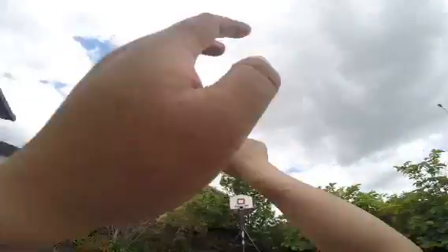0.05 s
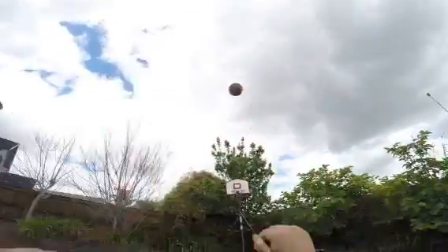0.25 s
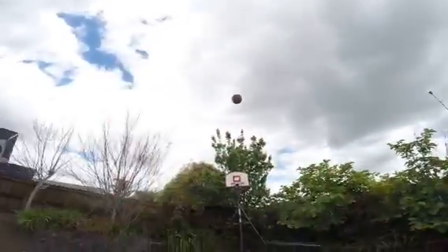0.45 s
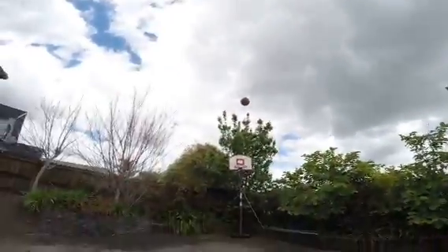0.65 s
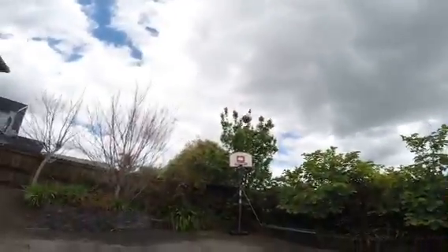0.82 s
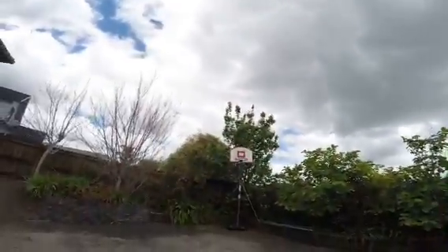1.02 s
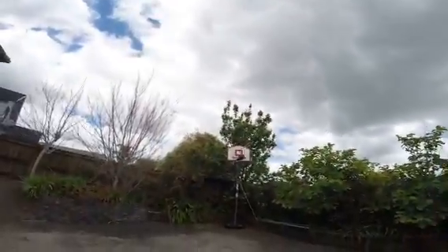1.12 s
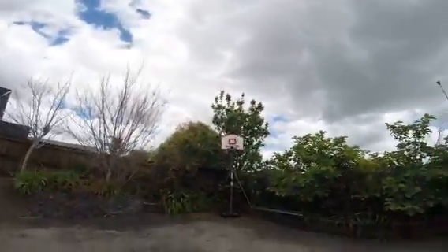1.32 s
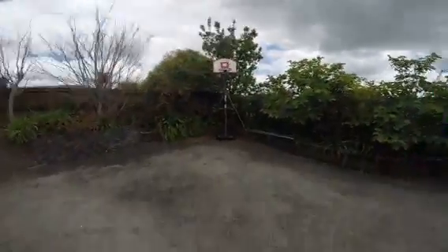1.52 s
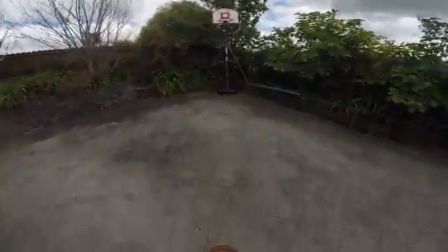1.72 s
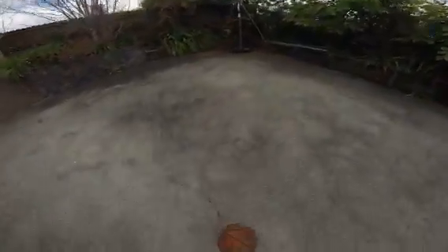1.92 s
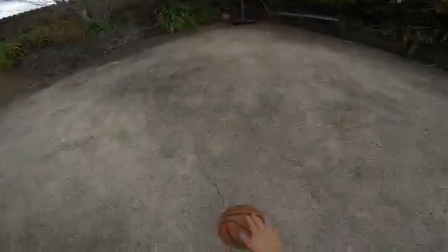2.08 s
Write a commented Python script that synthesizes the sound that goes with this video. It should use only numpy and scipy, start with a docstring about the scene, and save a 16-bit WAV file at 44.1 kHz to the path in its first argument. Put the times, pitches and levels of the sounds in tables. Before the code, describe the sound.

A basketball rattles in a steel rim and jingles through a chain net, several metres away in a quiet backyard. Before that, the throw rustles clothing and pushes a low puff of air over the body-worn microphone.

```python
"""A basketball rattles in the steel rim of a backyard hoop and drops through a chain net.
Its knocks ring the rim and thud the backboard; clashing links jingle; the yard echoes both.
Several metres away, at a body-worn camera, the throw rustles clothing and pushes air over
the microphone. Plastic ticks, light wind, an outdoor hush and a faint whine lie underneath."""
import sys
import numpy as np
from scipy import signal
from scipy.fft import rfft, irfft
from scipy.io import wavfile

SR = 44100
rng = np.random.default_rng(int(sys.argv[2]) if len(sys.argv) > 2 else 0)


def dump(signal):
    """Clip the signal to [-1, 1] and save it as 16-bit WAV at the path in sys.argv[1]."""
    limited = np.clip(np.atleast_2d(signal).T, -1, 1)
    pcm = np.round(limited * 32767).astype(np.int16)
    wavfile.write(sys.argv[1], SR, pcm)


N = 94815
T = np.arange(N) / SR


def rim(clack_db=-62, thud_db=-68, ring_db=-66.5, rise_s=0.0007):
    """Each knock chatters the loose rim, ringing its modes, and thuds the backboard."""
    # ball on rim: (time [s], level [dB], contact decay [s], relative backboard thud [dB])
    knocks = [(1.25, -8.5, 0.0068, 12), (1.2859, 4.5, 0.0065, -1.5), (1.294, 0, 0.0099, -4),
              (1.3008, -0.5, 0.013, -5), (1.313, -4.5, 0.0065, 5), (1.3218, -1, 0.0047, 8),
              (1.3271, -13, 0.0025, 11), (1.333, 0.5, 0.0043, -22), (1.338, -6.5, 0.0041, -10)]
    # dry contact spectrum: (frequency [Hz], level [dB])
    clack_spectrum = [(150, -25), (500, -6), (850, -5), (1400, 7), (1850, -8), (2500, 0), (3200, -9),
                      (5000, -10.5), (7500, -11.5), (15000, -25.5)]
    # rim and bracket: (frequency [Hz], level [dB], t60 [s])
    rim_modes = [(505, 2, 0.21), (597, -13, 0.1), (706, -1.5, 0.035), (1087, -14, 0.1), (1274, -2, 0.077),
                 (1345, -6, 0.19), (1437, -2, 0.11), (1460, 6, 0.18), (1484, 3.5, 0.19), (2110, 0, 0.12),
                 (2282, -9, 0.11), (2506, -7, 0.11), (2620, 7.5, 0.09), (3960, -18, 0.16)]
    # hollow backboard panel: (frequency [Hz], level [dB], t60 [s])
    board_modes = [(528, 4, 0.034), (730, 0, 0.028), (897, -3, 0.017), (1052, -4.5, 0.064)]
    blows = [amp(db) * swell(time_s, rise_s, decay_s) for time_s, db, decay_s, _ in knocks]
    chatter = sum(blows) * grains(per_s=5800, spread_db=2.0)
    push = sum(blow * amp(board_db) for blow, (*_, board_db) in zip(blows, knocks))
    clack = colour(chatter, clack_spectrum)
    tone = through(chatter, ring(rim_modes))
    thud = through(push * grains(per_s=4100, spread_db=0.5), ring(board_modes))
    return amp(clack_db) * unit(clack) + amp(thud_db) * unit(thud) + amp(ring_db) * unit(tone)


def net(links=6, clashes_per_s=2200, detune=0.004):
    """The ball snaps the chain, which swings back; links clash, each ringing at its own pitch."""
    # net shakes: (peak time [s], level [dB], rise [s], decay [s], relative link ring [dB])
    shakes = [(1.269, -50.5, 0.014, 0.048, -11), (1.293, -43, 0.012, 0.021, -3.5),
              (1.326, -53.5, .012, 0.026, -6), (1.418, -56, 0.0069, 0.011, -12),
              (1.437, -56, 0.019, 0.018, 3), (1.466, -59.5, 0.023, 0.018, 5.5)]
    # link on link: (frequency [Hz], level [dB])
    clash_spectrum = [(500, -16), (2200, 4), (3600, 0.5), (4600, 2), (5700, -6), (6500, 0), (7500, -12.5),
                      (8300, -4), (9800, -5.5), (11000, -16), (12000, -7.5), (13500, -22), (15000, -15)]
    # chain link: (frequency [Hz], level [dB], t60 [s])
    link_modes = [(4540, -0.5, 0.057), (4640, 2, 0.05), (4890, 4.5, 0.055), (4800, -1, 0.024),
                  (6210, 5, 0.063), (6330, 5, 0.066), (6340, 5.5, 0.032), (8150, -20, 0.064),
                  (9400, -12, .06), (12100, -17, 0.08)]
    jingle = np.zeros(N)
    for peak_s, shake_db, rise_s, decay_s, ring_db in shakes:
        shake = amp(shake_db) * swell(peak_s, rise_s, decay_s) / np.sqrt(links)
        clashes = [shake * grains(clashes_per_s / links, spread_db=1.5) for _ in range(links)]
        jingle += colour(sum(clashes), clash_spectrum)
        for link in clashes:
            modes = [(hz * (1 + detune * rng.standard_normal()), db, t60_s)
                     for hz, db, t60_s in link_modes]
            jingle += amp(ring_db) * unit(through(link, ring(modes))) * np.std(link)
    return jingle


def yard(x):
    """Scattered echoes off ground, fence and bushes."""
    # echo decay: (frequency [Hz], t60 [s])
    decay_times = [(300, 0.59), (1500, 0.49), (5000, 0.51), (14000, 0.35)]
    size = SR // 2
    taps = rng.standard_normal(size) * (rng.random(size) < 0.08) * (T[:size] > 0.004)
    hz, time_s, spectra = signal.stft(taps, SR, nperseg=256)
    decay = np.exp(-np.log(1000) * time_s / read(decay_times, hz)[:, None])
    _, response = signal.istft(spectra * decay, SR, nperseg=256)
    return through(x, response)


def clothing(brush_db=-54, squeak_db=-66, squeak_hz=3480, squeak_width_hz=140):
    """Fabric friction swells as the thrower moves; one sleeve brushes crisply, one rub squeaks."""
    # movements: (peak time [s], level [dB], rise [s], decay [s])
    rustles = [(.012, -56.5, 0.059, 0.067), (.13, -57, 0.027, 0.06), (.165, -61.5, 0.021, 0.12),
               (.352, -57, 0.037, 0.065), (.48, -59.5, 0.044, 0.066), (.65, -60.5, 0.022, 0.034),
               (1.494, -57, 0.03, 0.028), (1.62, -57.5, 0.058, 0.084)]
    # fabric friction: (frequency [Hz], level [dB])
    cloth_spectrum = [(300, -27), (900, -9), (1400, 5), (1800, -5), (2200, 4), (2850, 1.5), (3250, -15),
                      (5500, -12.5), (9000, -35.5), (15000, -49)]
    # sleeve brush: (frequency [Hz], level [dB])
    brush_spectrum = [(1000, -9), (2500, 8.5), (3400, -2), (6000, -8), (12000, -29)]
    motion = sum(amp(db) * swell(peak_s, rise_s, decay_s) for peak_s, db, rise_s, decay_s in rustles)
    rustle = colour(motion * grains(per_s=6000, spread_db=4.0), cloth_spectrum)
    stroke = swell(peak_s=0.169, rise_s=0.013, decay_s=0.0064)
    brush = colour(stroke * grains(per_s=2200, spread_db=6), brush_spectrum)
    rub = swell(peak_s=0.49, rise_s=0.057, decay_s=0.017) * rng.standard_normal(N)
    resonance = np.exp(-np.pi * squeak_width_hz * T) * np.sin(2 * np.pi * squeak_hz * T)
    return rustle + amp(brush_db) * brush + amp(squeak_db) * through(rub, resonance)


def ticks(scatter_db=-10):
    """Tiny plastic clicks near the camera, with a few milliseconds of scatter."""
    # clicks: (time [s], level [dB], frequency [Hz], decay [s], relative crack [dB])
    events = [(0.0495, -57, 12200, 0.0002, 6), (1.0636, -35, 2450, 0.00042, -22),
              (2.1475, -31.5, 2970, 0.0014, 0)]
    # sharp edge of a click: (frequency [Hz], level [dB])
    crack_spectrum = [(200, -21), (1000, 10), (4200, -10), (5500, 4.5), (7700, -2), (9000, -20),
                      (15000, -23)]
    clicks = np.zeros(N)
    for time_s, db, hz, decay_s, crack_db in events:
        tone = np.sin(2 * np.pi * hz * (T - time_s))
        crack = amp(crack_db) * noise(crack_spectrum, low_hz=200)
        envelope = swell(peak_s=time_s + 0.00043, rise_s=0.00038, decay_s=decay_s)
        clicks += amp(db) * envelope * (tone + crack)
    scatter = rng.standard_normal(N) * swell(peak_s=0.0015, rise_s=0.0011, decay_s=0.002)
    return clicks + amp(scatter_db) * through(clicks, scatter)


def wind():
    """Low buffeting on the microphone, with single pressure swings as the arms sweep past."""
    # buffeting: (frequency [Hz], level [dB])
    wind_spectrum = [(5, -20), (14, 1.5), (28, -1), (50, -6), (70, -18), (100, -23), (160, -38.5),
                     (400, -108)]
    # wind strength: (time [s], level [dB])
    gusts = [(0, -32), (.2, -33), (.33, -29.5), (.5, -40.5), (.7, -34), (.8, -49.5), (.9, -38.5),
             (1.03, -44.5), (1.12, -47), (1.5, -43.5), (1.62, -47.5), (1.78, -41.5), (1.9, -38.5),
             (2.15, -39.5)]
    # air puffs: (time [s], level [dB], frequency [Hz], half length [s])
    puffs = [(0.073, -22, 47.7, 0.013), (0.105, -20, 37.4, 0.018), (0.2437, -4.5, 36.9, 0.016),
             (0.284, -17, 26.3, 0.024), (1.022, -37.5, 55.7, 0.02), (1.45, -35, 35, 0.0058),
             (1.556, -29.5, 27.7, 0.013), (1.983, -36, 31.3, 0.012), (2.081, -27.5, 29.3, 0.011)]
    pressure = noise(wind_spectrum, low_hz=5.2) * amp(np.interp(T, *np.transpose(gusts)))
    for time_s, db, hz, half_s in puffs:
        envelope = np.exp(-((T - time_s) / half_s) ** 2)
        pressure += amp(db) * envelope * np.sin(2 * np.pi * hz * (T - time_s))
    return pressure


def hush(level_db=-55):
    """Steady, quiet outdoor noise."""
    # outdoor air: (frequency [Hz], relative density [dB])
    hush_spectrum = [(59, -31.5), (100, 2), (200, -3), (310, -4.5), (352, -9.5), (375, -5), (407, -8.5),
                     (1400, -14.5), (1730, -15.5), (2130, -17), (10500, -36), (11900, -41), (15000, -43)]
    return amp(level_db) * noise(hush_spectrum, low_hz=68.6)


def whine():
    """Faint, steady high tones from the camera."""
    # whine tones: (frequency [Hz], rms level [dB])
    tones = [(8780, -89.5), (11687, -93), (11719, -81)]
    return sum(amp(db) * np.sqrt(2) * np.sin(2 * np.pi * hz * T) for hz, db in tones)


def amp(db):
    """Decibels to gain."""
    return 10 ** (np.asarray(db) / 20)


def unit(x):
    """Scale to rms 1."""
    return x / np.sqrt(np.mean(x ** 2) + 1e-20)


def read(points, hz):
    """Interpolate a table over log frequency."""
    points_hz, values = np.transpose(points)
    return np.interp(np.log(hz + 1), np.log(points_hz + 1), values)


def through(x, response):
    """Convolve with a response scaled to unit energy."""
    return signal.fftconvolve(x, response / np.linalg.norm(response))[:N]


def colour(x, spectrum, size=2048):
    """Minimum-phase filter with the given spectral shape."""
    hz = abs(np.fft.fftfreq(size, 1 / SR))
    log_gain = np.log(amp(read(spectrum, hz)))
    transfer = np.exp(np.conj(signal.hilbert(log_gain)))
    return through(x, np.fft.ifft(transfer).real[:size // 2])


def noise(spectrum, low_hz):
    """Shaped noise, rms 1, rolled off below low_hz."""
    hz = np.fft.rfftfreq(N, 1 / SR)
    gain = amp(read(spectrum, hz)) * hz ** 2 / (hz ** 2 + low_hz ** 2)
    return unit(irfft(rfft(rng.standard_normal(N)) * gain, N))


def grains(per_s, spread_db):
    """Random clicks of uneven size, rms 1."""
    hits = rng.random(N) < per_s / SR
    size = amp(spread_db * np.clip(rng.standard_normal(N), -2, 2))
    sign = rng.choice([-1., 1.], N)
    return unit(hits * sign * size)


def swell(peak_s, rise_s, decay_s):
    """Gaussian rise, exponential decay."""
    age_s = T - peak_s
    return np.exp(-(np.minimum(age_s, 0) / rise_s) ** 2 - np.maximum(age_s, 0) / decay_s)


def ring(modes):
    """Struck-body response: decaying sines of random phase."""
    t = T[:SR // 2]
    return sum(amp(db) * np.exp(-np.log(1000) * t / t60_s) * np.sin(2 * np.pi * (hz * t + rng.random()))
               for hz, db, t60_s in modes)


def scene(echo_db=-8):
    """Distant hoop and its echoes, close sounds and outdoor hush; mono."""
    hoop = rim() + net()
    background = hush()
    return (hoop + amp(echo_db) * yard(hoop) + clothing() + ticks() + wind() + background)[None]


def record(dry):
    """The camera adds its whine and limits the band."""
    cutoff_hz = 15150
    lowpass = signal.firwin(511, cutoff_hz, window=("kaiser", 9), fs=SR)
    return signal.oaconvolve(dry + whine(), lowpass[None], "same")


dry = scene()
out = record(dry)
dump(out)
```